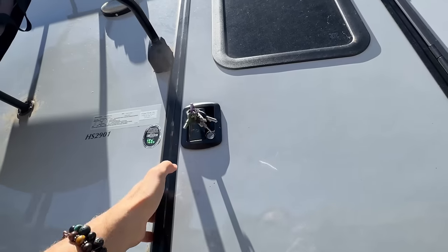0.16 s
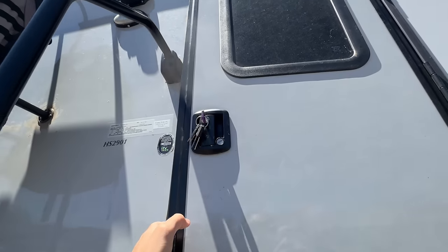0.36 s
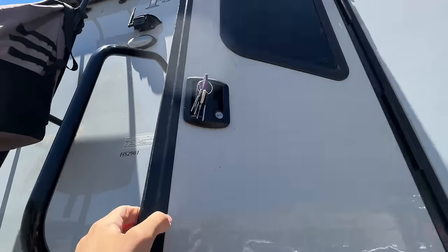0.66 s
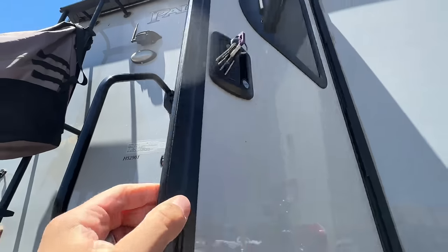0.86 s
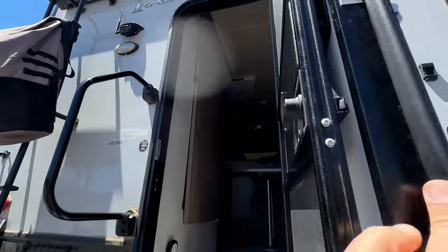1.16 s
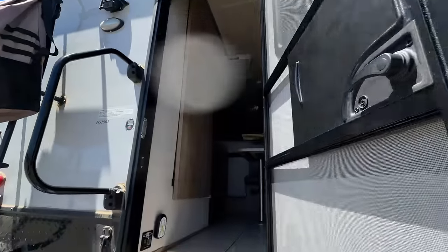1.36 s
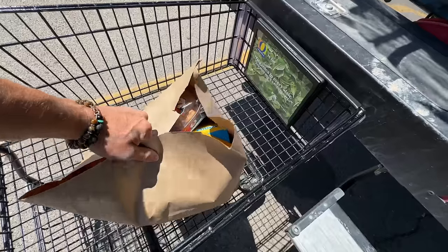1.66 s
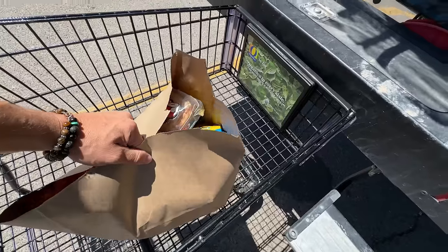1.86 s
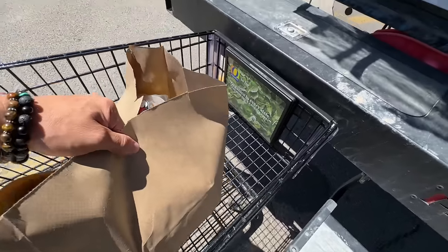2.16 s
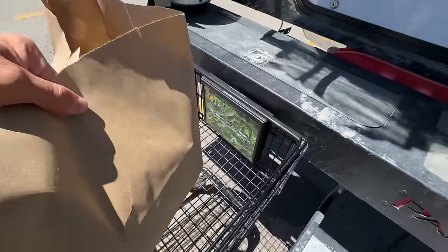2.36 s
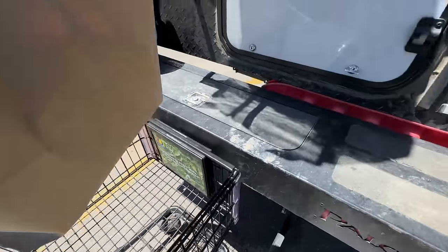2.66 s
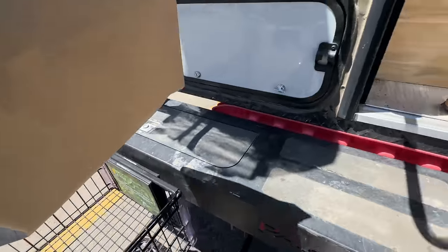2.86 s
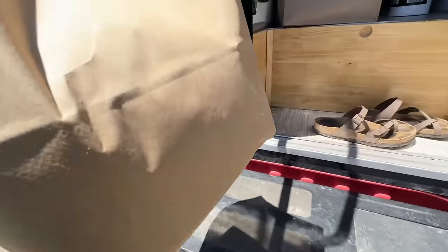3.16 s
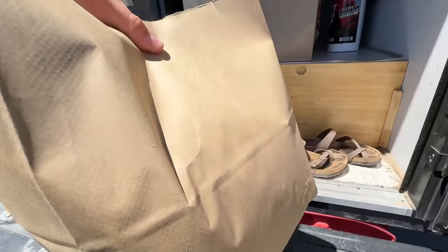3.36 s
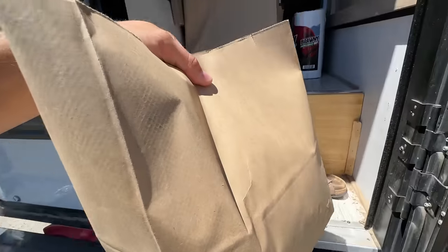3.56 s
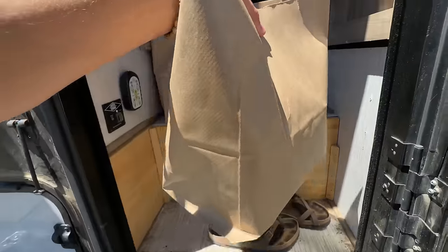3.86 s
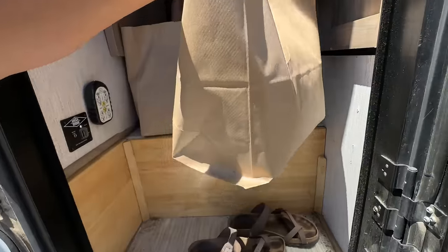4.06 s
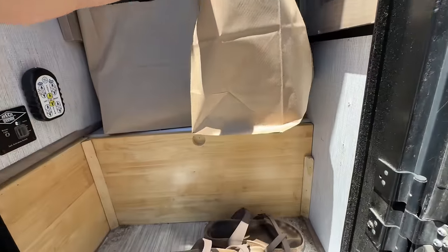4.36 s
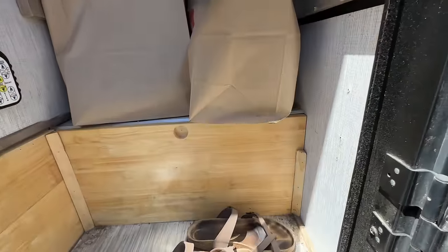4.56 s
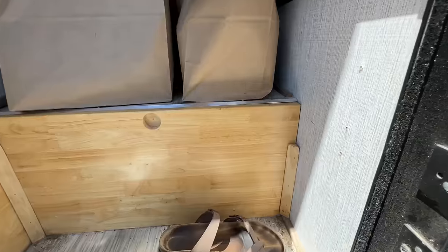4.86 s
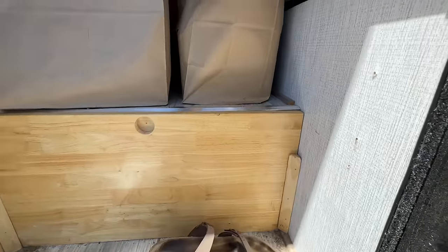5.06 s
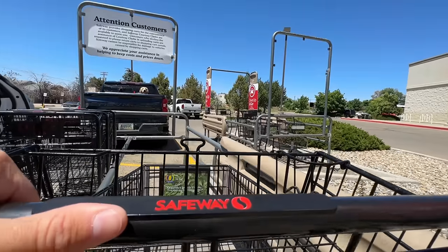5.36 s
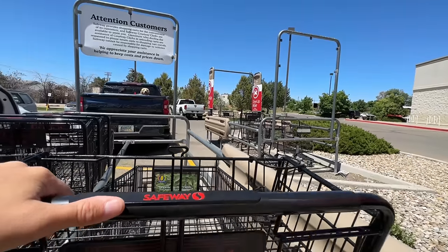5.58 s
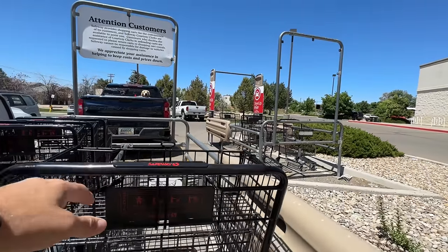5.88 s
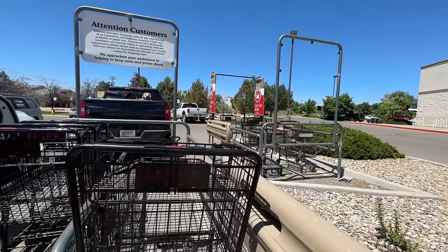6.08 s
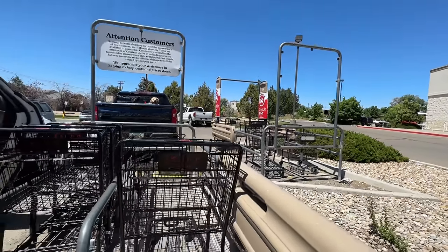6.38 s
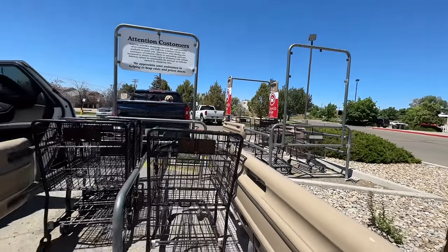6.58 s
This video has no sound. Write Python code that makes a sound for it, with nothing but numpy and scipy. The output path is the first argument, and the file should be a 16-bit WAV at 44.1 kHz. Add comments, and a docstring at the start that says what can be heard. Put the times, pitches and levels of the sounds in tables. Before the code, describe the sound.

A close outdoor stereo scene over constant low traffic drone, with soft wind buffets mostly in the first 1.5 seconds and near the end. From 0 keys jingle brightly in quick irregular ticks, thinning after 0.6; a deep, dull door knock lands at 0.25. A tiny gliding bird whistle passes faintly at 1.24. Between 1.3 and 1.85 the door seal peels and breaks free in dense dry cracks. Stiff paper snaps and rubs around 2.0 to 2.6, with a sharp hard click at 2.94, then quieter rustles and small bumps near 3.4. After a lull, paper stirs at 4.5 and the bag thumps woodily at 4.8, crackling with pops until 5.25. At 5.28 a wire cart bursts in with a harsh metallic crash, rattling down through separate clanks, a second cluster at 6.1 to 6.4, and fading by 6.7.

```python
"""Keys, paper bag and cart

In a car park beside a road, keys jingle in a camper door, which knocks and pulls open over its seal.
A paper grocery bag crackles as it is lifted and thumps onto a wooden shelf; a wire cart crashes into others.
Ringing tones make keys, knocks and pops; shaped noise makes paper, rattling wires, traffic and wind.
The road drones throughout, wind buffets now and then, and a bird gives one faint gliding whistle.
"""
import sys
import numpy as np
from scipy import signal
from scipy.fft import rfft, irfft, next_fast_len
from scipy.io import wavfile
from scipy.ndimage import uniform_filter1d, map_coordinates

SR = 44100
rng = np.random.default_rng(int(sys.argv[2]) if len(sys.argv) > 2 else 0)


def transcribe(signal):
    """Save signal, clipped to [-1, 1], as a 16-bit WAV file at the path in sys.argv[1]."""
    frames = np.atleast_2d(signal).T
    limited = np.clip(frames, -1, 1)
    pcm = np.round(limited * 32767).astype(np.int16)
    wavfile.write(sys.argv[1], SR, pcm)


def makeup_ratio(level_db):
    """Linear amplitude ratio for a level in decibels (20 dB per factor of ten)."""
    decades = np.asarray(level_db, float) / 20
    return 10 ** decades


N = 296352

# Levels are starting points: the functions add their own offsets.
# colour of the traffic noise: f/Hz, level/dB
ROAD_COLOUR = [(56, -47), (95, -7.5), (201, -14.5), (417, -13), (641, -12), (1070, -15.5), (1870, -22),
               (2500, -22.5), (3000, -28.5), (5240, -35), (7400, -40), (8590, -37.5), (16000, -46)]
# engine drone resonances, each passed twice: f/Hz, width of one pass/Hz, level/dB
ENGINE_TONES = [(82.3, 11.5, -10.5), (149.3, 3.7, -17)]
# how alike left and right are in far sound: f/Hz, likeness from -1 to 1
LIKENESS = [(60, 1), (130, 0.74), (290, 0.13), (640, -0.5), (1410, -0.32), (3100, -0.11), (6820, 0.27),
            (15000, -0.99)]
# traffic over time: t/s, roar level/dB, brightness/dB, engine drone level/dB
TRAFFIC_LEVELS = [(0, -37.5, 1, -46), (.5, -41, 0, -41), (.75, -42.5, 0.5, -55), (1.0, -40.5, 1, -44),
                  (1.3, -39, 0.5, -86), (1.62, -34, 2, -36.5), (2.0, -44.5, -1.5, -40),
                  (2.9, -42.5, 3, -39), (3.0, -40.5, -1.5, -41), (3.35, -42, -1, -39),
                  (4.3, -45.5, 4.5, -37.5), (5.2, -32.5, 3.5, -41.5), (5.5, -51, 15.5, -46),
                  (6.1, -50.5, 12, -51), (6.44, -49, -3, -37.5), (6.72, -45, 0, -51)]
# wind puffs: t/s, level/dB, rise over 20 dB/s, fall over 20 dB/s
WIND_PUFFS = [(0, -19, .05, 0.16), (.252, -34, 0.24, 1), (.518, -25, 0.2, 0.46), (.82, -32.5, 0.18, 0.05),
              (1.06, -32, 0.19, 0.031), (1.18, -47, 0.14, 0.12), (1.35, -34.5, 0.077, 0.3),
              (4.55, -35.5, 0.31, 0.5), (6.29, -25.5, 0.082, 0.065), (6.62, -30.5, 0.15, 0.31)]
# key contacts: t/s, level/dB, lock-plate level/dB, ring level/dB, left-right/dB
KEY_CONTACTS = [(0.0014, -23.5, 0, -16, 0), (0.018, -26.5, 5.5, -19, -1), (0.037, -25.5, 5, -24, -1),
                (0.0415, -19, 3, -19, 0), (0.047, -34, 5, -16, -3), (0.063, -33, -8, -10, -10),
                (0.0825, -30, -24, 2, -2.0), (0.1, -31.5, -24, 5.5, -2), (.136, -40, -10, -15, 0),
                (0.149, -34, -10, -10, -3), (0.1791, -22, -12, -9, 0), (0.2206, -32.5, -20, -3, 1),
                (0.2755, -43.5, -27, 2, -8), (0.294, -41, -15, -2, 1), (0.403, -19, -2.5, -10, -3),
                (0.432, -30, -1.5, -16.5, -10.5), (0.463, -34, -10, -14, -4), (0.4813, -43, -11, -1, 1),
                (0.576, -45.5, -3, -15, -9), (0.779, -30, -7.5, -4, -2.5), (1.035, -37, 1, -15, 2),
                (1.227, -46, -20, -15, -5)]
# ringing of the keys: f/Hz, level/dB, fall over 60 dB before a random scaling/s
KEY_TONES = [(6470, -5, 0.017), (8540, -4.5, 0.076), (10710, -13, 0.16), (11800, -15, .2),
             (12100, -4, 0.17), (14580, 4, 0.075)]
# blows on door and shelf and from the carts: t/s, level/dB, brightness/dB per octave, damping factor
BLOW_HITS = [(.004, -29.5, 7, 0.88), (0.253, -1.5, -6.5, 4.3), (3.37, -32.5, 7.5, 4),
             (3.382, -27.5, 6, 1.4), (4.794, -14, 9, 1.4), (4.802, 3, 1.3, 2.7), (4.826, -7, -1, 0.75),
             (4.877, -6.5, 1, 4.2), (6.245, -17, -15, 3.2), (6.264, -39, -2, 1.7), (6.286, -24, 13, 4.3),
             (6.319, -22, -15, 3.3), (6.409, -23, -5, 3.6)]
# ringing of the panel: f/Hz, level/dB, fall over 60 dB at damping factor 1/s
PANEL_TONES = [(78.7, -10, 0.25), (111.1, 0.5, 0.5), (150.6, 2.5, 0.26), (207, 3.5, 0.085), (268, -6, 0.16),
               (323, 3, 0.2), (443.5, -13, 0.24), (474.6, 0, 0.15), (634, -7.5, 0.056), (760, -28, 0.08)]
# bird whistles: t/s, length/s, top f/Hz, level/dB
WHISTLES = [(1.242, 0.041, 4520, -54.5)]
# snaps of seal and stiff paper: t/s, level/dB, boom level/dB, sizzle level/dB, basic fall over 60 dB/s
CREASE_SNAPS = [(1.3113, -30, -6, -1, 0.045), (1.3407, -27.5, -15, 2.5, 0.12), (1.39, -31, 3, 3, 0.12),
                (1.4, -26, -25, -18, 0.08), (1.4515, -34, -12, 2, .03), (1.4693, -32, -17, 3, 0.034),
                (1.43, -35, -3, -8, 0.043), (1.4903, -27, 6, -12, 0.07), (1.523, -36, 0.5, -8, 0.054),
                (1.542, -29.5, -3, 0, .05), (1.566, -29, -9, 3, 0.034), (1.589, -36.5, 11, -14, .05),
                (1.5962, -14, 0, -7, 0.031), (1.6, -25, 19.5, -15, 0.027), (1.6178, -16.5, -2, 1, 0.043),
                (1.625, -11, -1, 1, 0.028), (1.641, -22, -5, -12, 0.031), (1.654, -23, 7.5, -9, 0.093),
                (1.6703, -28.5, 6.5, -5, 0.093), (1.685, -27, 8, -5, 0.068), (1.708, -15, -3, -0.5, 0.079),
                (1.7123, -15, 0, -4, 0.025), (1.723, -19.5, 8, -20, 0.065), (1.736, -18, -6, -7, 0.05),
                (1.745, -33, 14, -7, 0.049), (1.7525, -20, -4, -6, 0.022), (1.7764, -11, 2, 13, 0.012),
                (1.793, -27.5, 8, -1, 0.044), (1.821, -20.5, 2.5, 5, 0.057),
                (1.9972, -20.5, -6, -13, 0.063), (2.016, -16, -2.5, -10, 0.042),
                (2.152, -22.5, -17, 1, 0.029), (2.166, -28.5, 5, -21, 0.055), (2.37, -35.5, 5, -9, 0.023),
                (2.4753, -36.5, 17.5, -16, 0.038), (2.547, -42, 12, -16, 0.082), (2.618, -43, 12, -1, 0.11),
                (2.9368, -16, 2, -11, 0.035), (3.065, -35, -12, -1, 0.03), (3.454, -38.5, 18, -29, 0.032),
                (3.486, -44, -15, -15, 0.024), (3.498, -33, -5, -4, 0.037), (3.33, -50, 1, 11, .02),
                (3.5626, -48, 2, -19, .02), (1.8634, -30, -6, -13, 0.023), (4.385, -42.5, 0, -12, 0.031),
                (4.52, -29.5, 13, -20, 0.029), (4.579, -28.5, 4, -30, 0.036), (4.713, -37, 6, -16, 0.057),
                (4.781, -34, 3, -30, 0.053), (4.93, -35.5, 3.5, -15, 0.18), (4.971, -32, 7.5, -12, 0.2),
                (5.017, -23, -5, -26, 0.036), (5.0718, -17, 1.5, -6, 0.048), (5.0945, -28, 4, -1, 0.076),
                (5.117, -36, 16, -8, 0.048), (5.155, -38, 6, -15, 0.08), (5.164, -29, 0, -18, 0.054),
                (5.188, -28, -3, -23, 0.073), (5.2041, -19, -6, -24, 0.051), (5.213, -25, 4, -22, .06),
                (5.254, -31, 3, -24, 0.25)]
# hand strokes on seal and paper: t/s, level/dB, rise over 20 dB/s, fall over 20 dB/s, extra sizzle/dB
HAND_STROKES = [(1.316, -34.5, 0.0058, 0.21, -4), (1.44, -55, 0.07, .1, 10), (1.53, -33.5, 0.097, 0.039, 2),
                (1.6, -31, 0.011, 0.29, 2), (1.713, -22, 0.0055, 0.027, 6.5), (1.76, -45, 0.066, 0.15, -5),
                (1.995, -44.5, 0.0059, 0.25, 0.5), (2.163, -27.5, 0.0095, 0.026, -3),
                (2.43, -51.5, 0.83, 0.3, 4), (2.622, -31, 0.0075, 0.042, -2), (2.89, -42, 0.086, 0.095, -6),
                (3.388, -46, 0.065, 0.026, -7), (3.46, -45, .03, 0.27, -8), (3.82, -53.5, 0.13, 0.17, 4),
                (4.02, -56.5, 0.11, 0.87, -1), (4.391, -43, 0.0067, 0.21, -4),
                (4.529, -34.5, 0.11, 0.13, 9.5), (4.81, -33.5, 0.22, 0.17, 5.5),
                (5.026, -24, 0.083, 0.029, 8.5), (5.12, -32, 0.14, 0.06, -17),
                (5.21, -39.5, 0.11, 0.068, 8)]
# short pitched pops of door, paper, bag contents and cart:
# t/s, level/dB, f/Hz, fall over 60 dB (at least 0.005)/s, left-right/dB
PITCHED_POPS = [(1.3412, -12, 5750, 0.011, 6), (1.401, -13, 2300, 0.024, -1),
                (1.404, -15.5, 1234, 0.03, -9), (2.478, -17.5, 270, 0.02, 6), (2.877, -35, 1900, .03, 0),
                (2.889, -33, 1990, .03, 0), (3.371, -20, 430, 0.037, 2), (3.384, -23.5, 368, .09, -10),
                (3.477, -31, 1850, .015, 0), (3.454, -25, 1800, .02, -3), (3.46, -21.5, 307, 0.024, 3),
                (4.804, -9.5, 185, 0.053, 14), (1.8637, -22, 2060, 0.01, -12),
                (1.8996, -33, 2770, 0.025, -1), (2.9362, 3, 1900, 0.0049, 4), (2.9362, -17, 1200, .015, 18),
                (2.9364, -15, 2560, 0.0075, -10), (2.943, -16, 2300, 0.021, 8),
                (2.9365, -19, 706, 0.098, -2.5), (2.9362, -11, 4270, 0.01, -12),
                (3.564, -18, 1340, 0.011, 0), (4.488, -24, 1090, 0.028, 16), (4.793, -6, 570, 0.044, -9),
                (4.799, -23.5, 1100, 0.036, 22), (4.812, -14, 760, 0.061, 7),
                (5.016, -3, 2770, 0.024, -6.5), (5.024, -8, 1200, 0.026, -3),
                (5.071, -14.5, 1250, 0.053, -4), (5.204, -18, 1690, 0.064, 5.5),
                (5.2045, -7, 2410, 0.033, 2), (6.115, -8, 720, 0.019, 3), (6.121, -10, 1020, .03, 6.5),
                (6.14, -23.5, 1415, 0.27, 0)]
# resonances of a sliding bag wall: f/Hz, width (tripled in use)/Hz, level/dB
BAG_WALL = [(1900, 290, -3), (2270, 40, -11), (4400, 59, 3), (4600, 86, 7), (5880, 980, -1),
            (7200, 120, -34)]
# bag slides: t/s, level/dB, rise over 20 dB/s, fall over 20 dB/s
BAG_SLIDES = [(2.79, -45.5, 0.056, 0.086), (2.885, -47.5, 0.094, 0.069), (2.3, -54.5, 0.23, .2)]
# cart motion: t/s, shaking level/dB, wheel bumping level/dB
CART_MOTION = [(5.275, -33, -32), (5.287, -11, -22), (5.34, -12.5, -27), (5.48, -17, -33),
               (5.62, -24, -48.5), (5.88, -24, -50), (6.08, -29.5, -54), (6.12, -24.5, -28),
               (6.17, -24, -27.5), (6.21, -29.5, -38), (6.26, -23.5, -32.5), (6.37, -27, -36),
               (6.5, -27, -47), (6.72, -40, -38.5)]
# cart hits: t/s, level/dB, frame level/dB
CART_HITS = [(5.281, -8, 14), (5.65, -8, 4), (5.7847, -9, -2), (5.9617, -17, 10), (6.1, -14, 14),
             (6.117, -20, 8), (6.14, -16, 2), (6.154, -15, 2), (6.231, -10.5, -12), (6.281, -17, 12),
             (6.39, -7.5, -15)]
# colour of the chattering wires: f/Hz, level/dB
WIRE_COLOUR = [(900, 6), (1500, 9), (3000, 9.5), (6000, 6.5), (10000, 9.5), (15000, 12.5)]
# basket resonances: f/Hz, width/Hz, level/dB
BASKET_TONES = [(2156, 295, 10), (3440, 316, 13), (4540, 590, 13), (6130, 630, 17.5)]
# cart frame resonances: f/Hz, width/Hz, level/dB
FRAME_TONES = [(720, 127, 2), (884, 190, 0.5), (1277, 180, -2), (2190, 400, -3)]
# gap near 11 kHz, cut from the mix before the keys are added: f/Hz, gain/dB
TREBLE_GAP = [(10300, 0), (10600, -45), (11900, -45), (12300, 0)]
# gain of the left-right difference: f/Hz, gain/dB
STEREO_WIDTH = [(60, -3.5), (300, -5.5), (1000, -0.5), (4000, 0), (8500, 1.5), (13000, -2)]
# overall tone of both channels: f/Hz, gain/dB
PICKUP_TONE = [(25, -20), (50, 1), (7000, -1), (8600, 0.5), (10300, -6), (15500, -8), (16200, -41),
               (17000, -71)]
# colour difference of the channels: f/Hz, left-right/dB
CHANNEL_LEAN = [(60, 1.0), (150, 0), (380, 3.5), (950, 2.5), (2380, -3), (5980, 0.5), (15000, -3)]


def unit(x):
    """Scales x to an rms (average strength) of 1."""
    return x / np.sqrt(np.mean(x ** 2) + 1e-20)


def along(points, hz):
    """Reads a curve of (frequency, value) points on a log frequency axis."""
    f, v = np.transpose(points)
    return np.interp(np.log(hz + 1), np.log(f + 1), v)


def curves(rows):
    """Gives one value per sample for each column, and -120 dB outside the rows."""
    s, *cols = np.transpose(rows)
    return [np.interp(np.arange(N) / SR, s, c, left=-120, right=-120) for c in cols]


def wobble(rate):
    """A smooth random curve with rate knots a second."""
    knots = rng.standard_normal(int(N * rate / SR) + 4)
    return map_coordinates(knots, [np.arange(N) * rate / SR])


def filtered(x, response):
    """Multiplies the spectrum of x by a response, which may be complex."""
    m = next_fast_len(N + 8192)
    return irfft(rfft(x, m) * response(np.fft.rfftfreq(m, 1 / SR)), m)[..., :N]


def resonant(modes):
    """Causal response of (frequency, width, level) resonances with alternating signs."""
    def response(f):
        return sum((-1) ** k * makeup_ratio(db) * 1j * f * w / (c * c - f * f + 1j * f * w)
                   for k, (c, w, db) in enumerate(modes))
    return response


def band(x, lo_hz, hi_hz):
    """Causal band-pass with a gain that makes up for the noise power cut away."""
    sos = signal.butter(2, [lo_hz, min(hi_hz, SR / 2.1)], "band", fs=SR, output="sos")
    return signal.sosfilt(sos, x) * np.sqrt(SR / 2 / (hi_hz - lo_hz))


def diffuse(response):
    """Stereo noise of rms 1 arriving from all round, with a likeness that varies with frequency."""
    def mid_side(hz):
        turn = np.arccos(np.clip(along(LIKENESS, hz), -1, 1)) / 2
        return response(hz) * np.array([np.cos(turn), np.sin(turn)])
    mid, side = filtered(rng.standard_normal((2, N)), mid_side)
    return unit(np.array([mid + side, mid - side]))


def grit(spiky_db, rate, apart_db):
    """Clumpy stereo noise: tiny contacts of uneven size, partly heard on one side only."""
    shared, left, right = rng.standard_normal((3, N))
    pair = shared + makeup_ratio(apart_db) * np.array([left, right])
    return unit(pair * makeup_ratio(spiky_db * wobble(rate)))


def near(x, lead_ms):
    """A near source reaches the left first; the lead shrinks for the shortest waves."""
    def lag(hz):
        turns = hz / (1 + (hz / 9000) ** 4) * lead_ms / 2000
        return np.exp(2j * np.pi * turns * np.array([[1], [-1]]))
    return filtered(x, lag)


def add(track, s, sound):
    """Lays a sound into a track at a time in seconds."""
    part = track[..., max(round(s * SR), 0):][..., :sound.shape[-1]]
    part += sound[..., :part.shape[-1]]


def sides(pan_db):
    """Left and right gains for a left-right level difference."""
    return makeup_ratio([[pan_db / 2], [-pan_db / 2]])


def swells(rows):
    """Envelopes that rise and fall evenly in dB, one a row, on a millisecond grid."""
    t = np.arange(0, N / SR + .001, .001)
    return np.array([makeup_ratio(db - 20 * np.maximum((s - t) / rise, (t - s) / fall))
                     for s, db, rise, fall, *_ in rows])


def smooth(env):
    """Brings a millisecond envelope to the sample rate."""
    return np.interp(np.arange(N) / SR, np.arange(len(env)) / 1000, env)


def patchy(x, depth_db):
    """Makes the colour uneven with random gains over patches of about 1 kHz by 40 ms."""
    z = signal.stft(x, nperseg=256)[2]
    field = uniform_filter1d(rng.standard_normal(z.shape[1:]), size=5, axis=0)
    field = uniform_filter1d(field, size=14, axis=1)
    return unit(signal.istft(z * makeup_ratio(depth_db * unit(field)), nperseg=256)[1][:, :N])


def road():
    """Traffic roar, tyre hiss, air, rumble and engine drone are filtered noise that wavers in level."""
    roar_db, bright_db, drone_db = curves(TRAFFIC_LEVELS)
    layers = [(roar_db, 95, 400),  # level/dB, lower edge/Hz, upper edge/Hz
              (roar_db - 4 + bright_db, 400, 3000),  # tyres
              (roar_db - 17 + 1.85 * bright_db, 3000, 16500)]  # air follows brightness faster
    far = np.zeros((2, N))
    for db, lo, hi in layers:
        def colour(hz):
            return makeup_ratio(along(ROAD_COLOUR, hz)) / (1 + (lo / (hz + 1)) ** 4) / (1 + (hz / hi) ** 4)
        far += makeup_ratio(db + 1.7 * wobble(8.6)) * patchy(diffuse(colour), depth_db=1.5)
    rumble = makeup_ratio(drone_db - 6.5) * diffuse(lambda hz: resonant([(55, 45, 0)])(hz) ** 2)
    drone = makeup_ratio(drone_db + 0.43 * wobble(5.16)) * diffuse(lambda hz: resonant(ENGINE_TONES)(hz) ** 2)
    return far + rumble + drone


def wind():
    """Puffs of wind are lumpy low noise that buffets each side on its own."""
    lumps = makeup_ratio(4 * np.array([wobble(12), wobble(12)]))
    buffet = filtered(rng.standard_normal((2, N)), lambda hz: resonant([(75, 110, 0)])(hz) ** 3)
    return smooth(swells(WIND_PUFFS).sum(0)) * sides(1.7) * unit(lumps * buffet)


def keys():
    """Each contact rings the keys at new strengths and ticks on the lock plate."""
    out, t = np.zeros((2, N)), np.arange(SR // 6) / SR
    for s, db, plate_db, ring_db, pan_db in KEY_CONTACTS:
        ring = np.zeros(len(t))
        for hz, level, t60 in KEY_TONES:
            fade = makeup_ratio(level + rng.normal(-2, 4) - 60 * t / (t60 * rng.uniform(.5, 1.2)))
            drift = np.cumsum(rng.normal(0, .03, len(t)))  # the pitch wanders slightly
            ring += fade * np.sin(2 * np.pi * hz * t + drift)
        shared, own = rng.standard_normal((2, 1, len(t))), rng.standard_normal((2, 2, len(t)))
        tail_s = 0.051 + 0.0016 * (db + 35)  # harder contacts last longer
        fade = (makeup_ratio(-60 * t / tail_s) + makeup_ratio(1.5 - 60 * t / 0.0092)) * (1 - np.exp(-t / 0.00083))
        tick = fade * (shared + makeup_ratio(-1) * own)
        sound = makeup_ratio(ring_db) * ring + makeup_ratio(-6) * band(tick[0], 2200, 25000)
        sound = sound + makeup_ratio(plate_db - 6.5) * band(tick[1], 530, 2670)
        add(out, s - .001, makeup_ratio(db) * sides(pan_db) * sound)
    return near(out, lead_ms=0.16)


def blows():
    """Each blow rings the panel's modes with a low puff; its own brightness weights the higher modes."""
    out, t = np.zeros((2, N)), np.arange(SR // 3) / SR
    for s, db, bright_db, damp in BLOW_HITS:
        ring = np.zeros(len(t))
        for k, (hz, level, t60) in enumerate(PANEL_TONES):
            fade = makeup_ratio(level + bright_db * np.log2(hz / 150) - 60 * t * damp / t60)
            ring += (-1) ** k * fade * np.sin(2 * np.pi * hz * t)
        puff_fade = makeup_ratio(2 * bright_db - 4.5 - 60 * t * damp / 0.33)
        puff = puff_fade * band(rng.standard_normal(len(t)), 140, 420)
        add(out, s - .002, makeup_ratio(db - 14) * (ring + puff) * (1 - np.exp(-t / 0.0013)))
    return out * sides(2.4)


def bird():
    """A faint, unsteady whistle glides up and down; its pitch is 15% lower at both ends."""
    out = np.zeros(N)
    for s, length, hz, db in WHISTLES:
        u = np.linspace(-1, 1, round(length * SR))
        flutter_db = uniform_filter1d(rng.normal(0, 40, len(u)), size=90)
        tone = np.sin(2 * np.pi * np.cumsum(hz * (1 - 0.15 * u ** 2)) / SR)
        add(out, s, makeup_ratio(db + flutter_db) * (1 - u ** 4) * tone)
    return out


def papery(body, boom, sizzle, contact, edge_hz=1200):
    """Three envelopes sound a sheet's middle, hollow boom and sizzle from one gritty contact."""
    def above(hz, cut_hz):
        return 1 / (1 + (cut_hz / (hz + 1)) ** 6)

    def parts(hz):
        middle = above(hz, edge_hz) - above(hz, 4600)
        hollow = makeup_ratio(6) * (above(hz, 225) - above(hz, 1100))
        return np.array([middle, hollow, makeup_ratio(-6) * above(hz, 4600)])[:, None]
    return makeup_ratio(8) * filtered(np.array([body * contact, boom * contact, sizzle * contact]), parts).sum(0)


def snaps():
    """A crease lets go with a sharp crack, then rattles out; the treble dies first."""
    env, t = np.zeros((3, 2, N)), np.arange(SR // 6) / SR
    for s, db, boom_db, sizzle_db, t60 in CREASE_SNAPS:
        levels = db + np.array([[0], [boom_db - 5], [sizzle_db - 3.5]])
        fall_db = -60 * t / t60 * np.array([[1], [.7], [1.3]])
        decay = makeup_ratio(levels) * (makeup_ratio(fall_db) + makeup_ratio(1.5 + 6 * fall_db)) * (1 - np.exp(-t / .0008))
        add(env, s - .001, decay[:, None] * sides(rng.normal(0.12, 2.7)))
    contact = patchy(grit(spiky_db=2, rate=500, apart_db=4.5), depth_db=2.5)
    # between these times (s) the door breaks free and its snaps crack higher
    door = np.digitize(np.arange(N) / SR, (1.58, 1.81)) == 1
    return near(papery(*env, contact * door, edge_hz=2300) + papery(*env, contact * ~door), lead_ms=0.426)


def rubs():
    """Sheets slide and crinkle under the hand; boom and sizzle follow each stroke at their own rates."""
    effort = swells(HAND_STROKES) / makeup_ratio(-40)  # 1 at a stroke of -40 dB
    extra = makeup_ratio(np.array(HAND_STROKES)[:, -1:])
    sizzle = makeup_ratio(-45.5) * (extra * effort ** 0.75).sum(0)
    effort = effort.sum(0)
    env = np.array([smooth(e) for e in (makeup_ratio(-40) * effort, makeup_ratio(-37.5) * effort ** 0.89, sizzle)])
    # small random creases ride on the strokes
    crinkles_per_s, crinkle_t60_s = 220, .009
    chance, size = rng.random(N), rng.exponential(size=N)
    kicks = (chance < crinkles_per_s / SR) * makeup_ratio(-6 + 3.5 * np.minimum(size, 3))
    crinkle = signal.lfilter([1], [1, -makeup_ratio(-60 / (crinkle_t60_s * SR))], kicks)
    env = env * (makeup_ratio(2.5 * wobble(40) - 3) + crinkle * np.array([[1], [.3], [.45]]))
    contact = patchy(grit(spiky_db=-2, rate=230, apart_db=4), depth_db=2)
    return near(papery(*env, contact), lead_ms=0.424)


def pops():
    """Door, paper, bag contents and cart give short pops; each rings briefly at one pitch."""
    out, t = np.zeros((2, N)), np.arange(SR // 10) / SR
    for s, db, hz, t60, pan_db in PITCHED_POPS:
        fade = makeup_ratio(db - 3 - 60 * t / max(t60, .005)) * (1 - np.exp(-t / 0.00032))
        add(out, s - .001, fade * np.sin(2 * np.pi * hz * t) * sides(pan_db))
    return near(out, lead_ms=0.568)


def slides():
    """The bag drags smoothly along an edge: a hiss through the wall's resonances."""
    wall = resonant(np.array(BAG_WALL) * [1, 3, 1])
    hiss = filtered(grit(spiky_db=2, rate=140, apart_db=5), wall)
    return smooth(swells(BAG_SLIDES).sum(0)) * unit(hiss)


def pings(count, cycles):
    """Single wires struck at random ring briefly near the basket's resonances, each from its own side."""
    when, which, detune, size, pan = rng.random((count, 5)).T
    hz, width, db = np.array(BASKET_TONES)[(which * len(BASKET_TONES)).astype(int)].T
    hz = (hz + 1.54 * width * (detune - .5))[:, None]
    t = np.arange(SR // 30) / SR
    fade = makeup_ratio((db + 12 * size)[:, None] - 60 * t * hz / cycles) * (1 - np.exp(-t / .001))
    ring = fade * np.sin(2 * np.pi * hz * t)
    first = CART_MOTION[0][0] * SR
    start = (first + when * (N - first)).astype(int)
    at = (start[:, None] + np.arange(len(t))).ravel()
    pair = np.array([np.bincount(at, (ring * share[:, None]).ravel(), N)[:N]
                     for share in (np.sqrt(pan), np.sqrt(1 - pan))])
    return pair / np.std(pair[:, start.min():])


def cart():
    """Loose wires chatter into the basket's resonances; jolts shake the frame and wheels bump below."""
    rattle, wheels = makeup_ratio(curves(CART_MOTION))
    # the frame rings at -28.5 dB for a shaking of -16 dB and gains 0.65 dB per dB of shaking
    frame = makeup_ratio(-28.5) * (rattle / makeup_ratio(-16)) ** 0.65 * (rattle > 1e-5)
    t = np.arange(SR // 10) / SR
    for s, db, frame_db in CART_HITS:
        add(rattle, s - .001, makeup_ratio(db - 19 - 60 * t / 0.064))
        add(frame, s - .001, makeup_ratio(db + frame_db - 25.5 - 60 * t / 0.22))

    def wires(hz):
        basket = np.abs(makeup_ratio(-12.5) * resonant(BASKET_TONES)(hz))
        return makeup_ratio(along(WIRE_COLOUR, hz)) * np.sqrt(1 + basket ** 2)
    dense = unit(filtered(grit(spiky_db=1, rate=590, apart_db=11), wires))
    chatter = rattle * makeup_ratio(1.6 * wobble(45)) * (dense + makeup_ratio(-13) * pings(count=800, cycles=360))
    shaken = unit(filtered(grit(spiky_db=-0.6, rate=25, apart_db=1.5), resonant(FRAME_TONES)))
    ring = frame * makeup_ratio(2.1 * wobble(30)) * shaken
    thud = wheels * band(grit(spiky_db=3.5, rate=40, apart_db=-6), 57, 405)
    return near(chatter + ring + thud, lead_ms=0.2)


def scene():
    """All sources together; a gap near 11 kHz is cut from the mix, then the keys are added without it."""
    rest = road() + wind() + blows() + bird() + snaps() + rubs() + pops() + slides() + cart()
    return keys() + filtered(rest, lambda hz: makeup_ratio(along(TREBLE_GAP, hz)))


def top_cut(x):
    """Nothing passes above the cut-off."""
    return signal.sosfilt(signal.butter(12, 16970, fs=SR, output="sos"), x)


def record(dry):
    """Sets stereo width and tone, rolls off the deepest bass and top treble, and clips peaks softly."""
    side = filtered((dry[0] - dry[1]) / 2, lambda hz: makeup_ratio(along(STEREO_WIDTH, hz)))
    pair = dry.mean(0) + side * np.array([[1], [-1]])
    halves = np.array([[.5], [-.5]])  # each channel takes half the colour difference
    pair = filtered(pair, lambda hz: makeup_ratio(along(PICKUP_TONE, hz) + along(CHANNEL_LEAN, hz) * halves))
    ceiling = .9
    pair = pair / (1 + np.abs(pair / ceiling) ** 4) ** .25
    return top_cut(pair)


dry = scene()
out = record(dry)
transcribe(out)
```